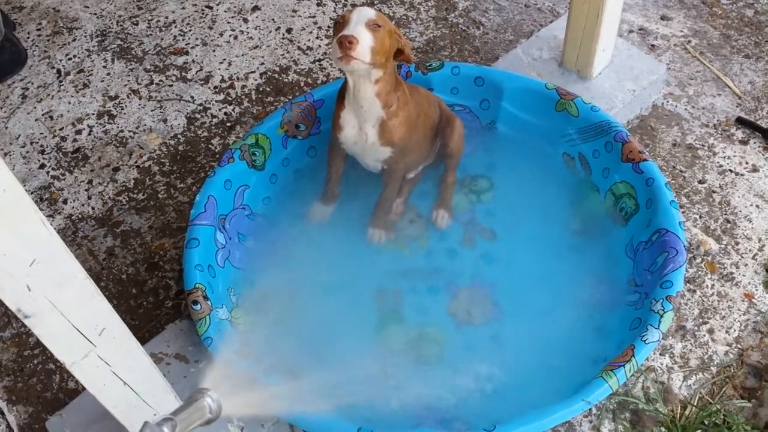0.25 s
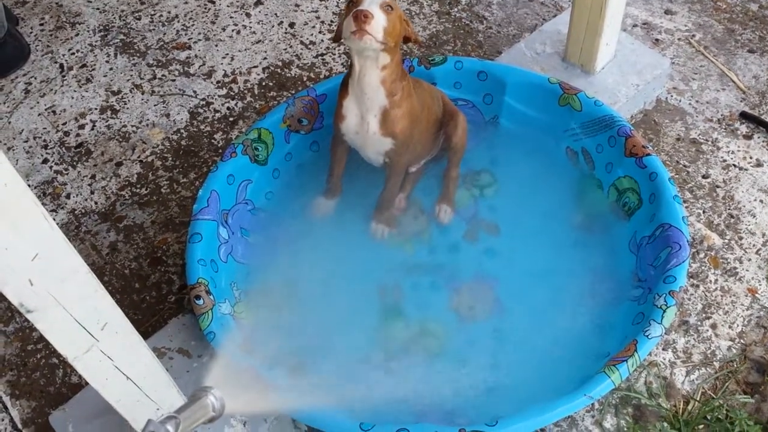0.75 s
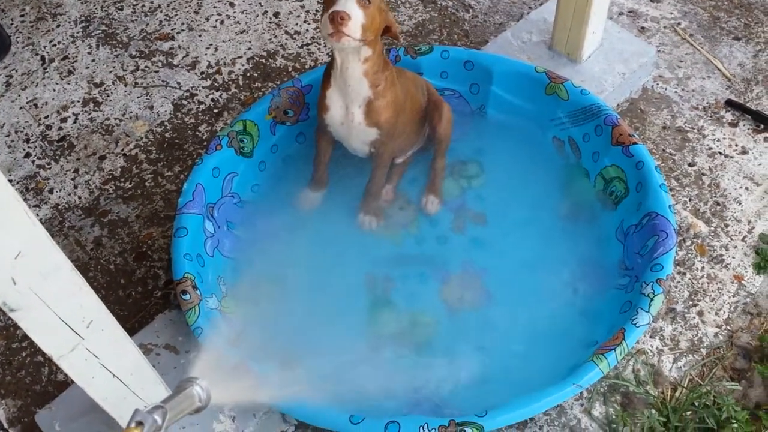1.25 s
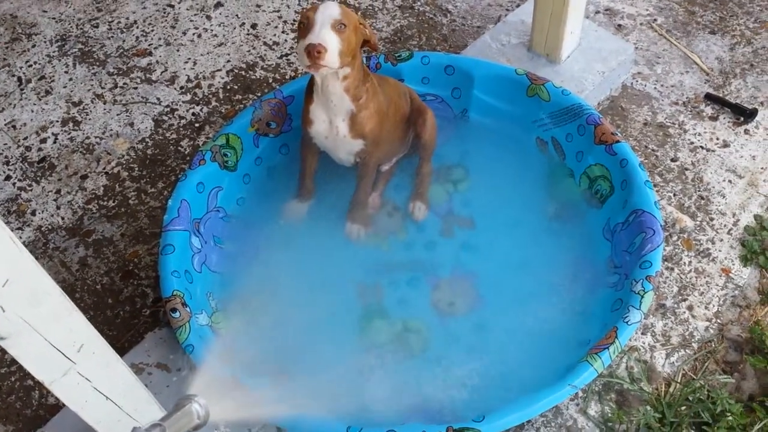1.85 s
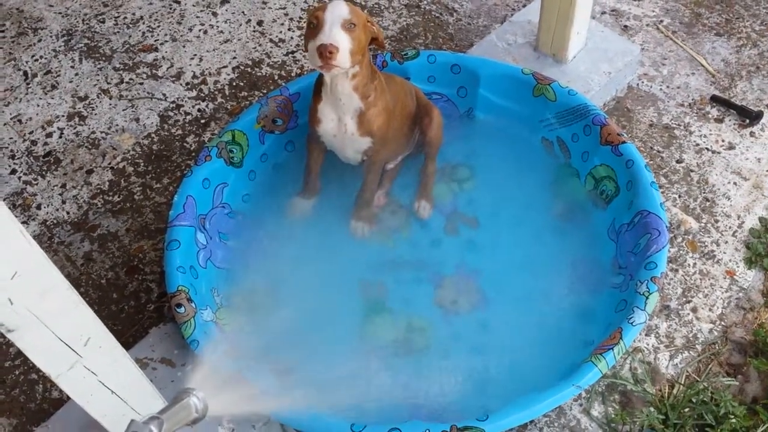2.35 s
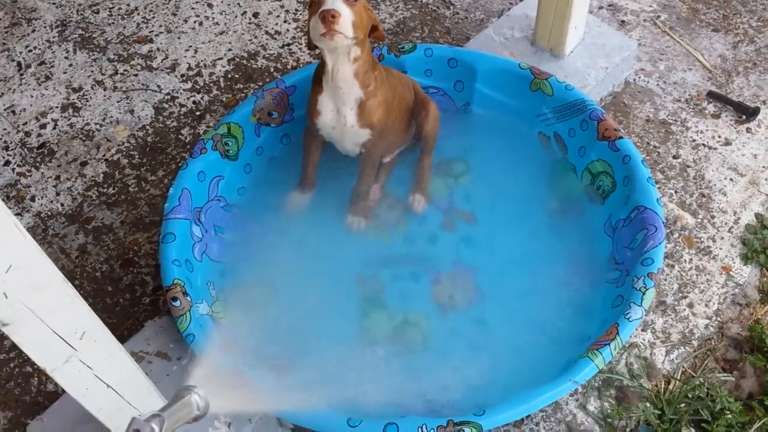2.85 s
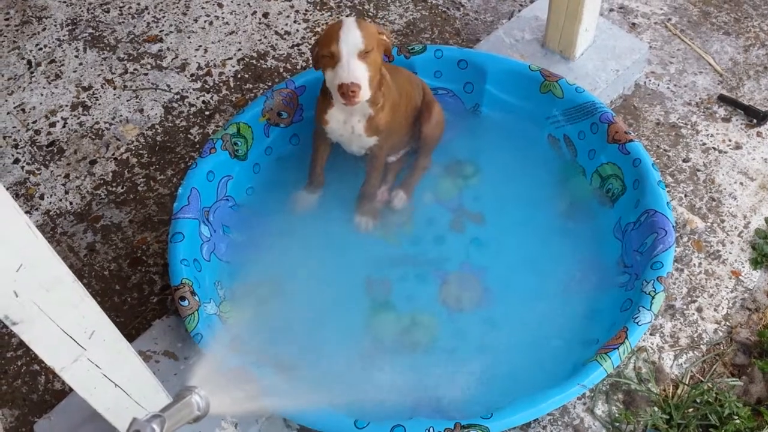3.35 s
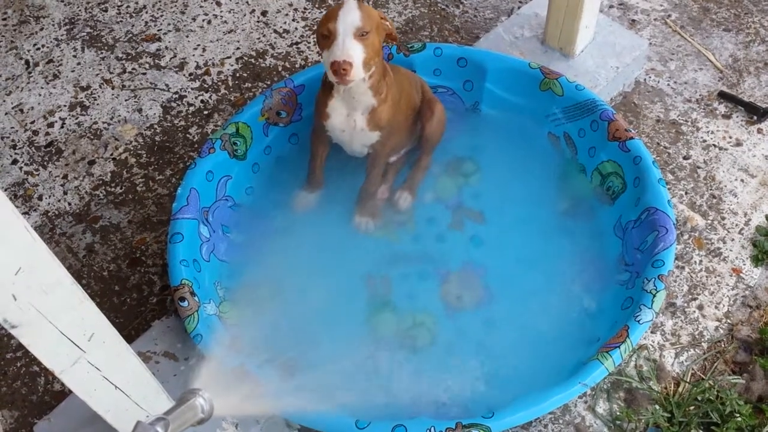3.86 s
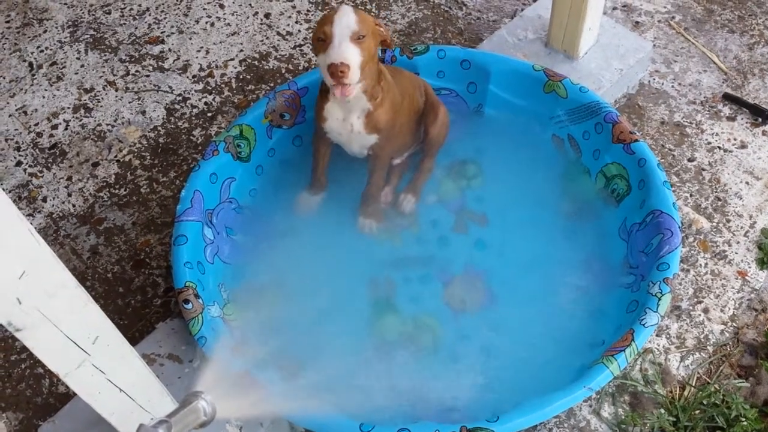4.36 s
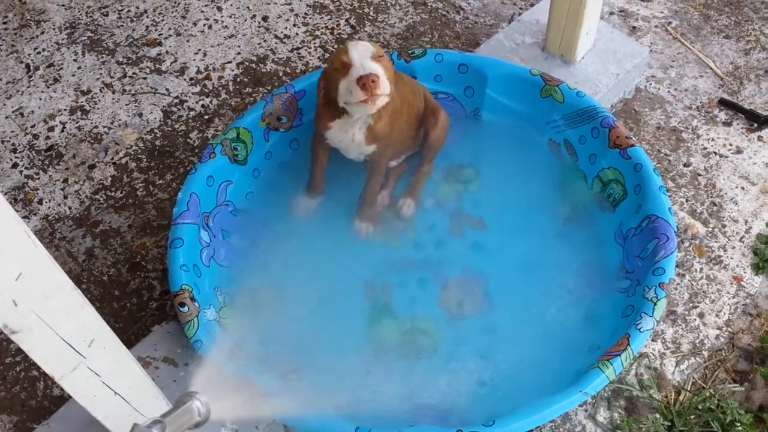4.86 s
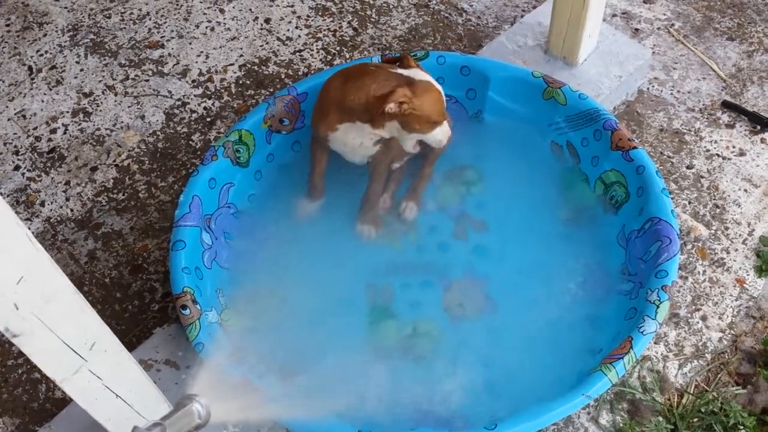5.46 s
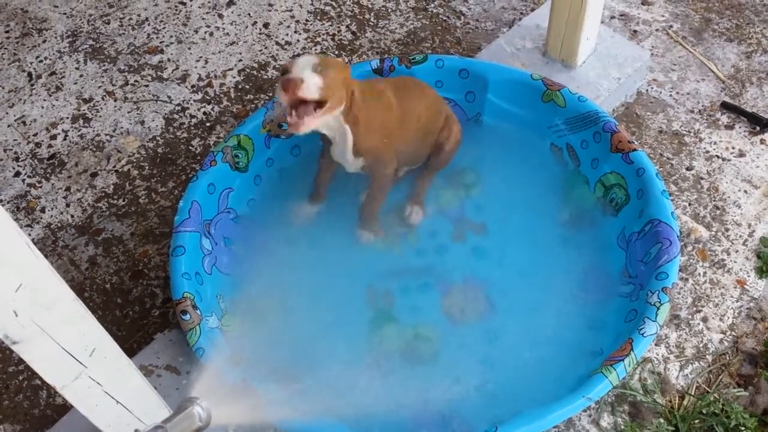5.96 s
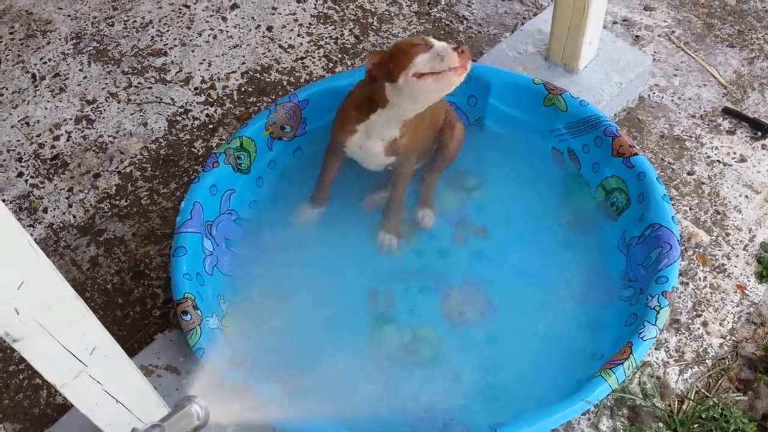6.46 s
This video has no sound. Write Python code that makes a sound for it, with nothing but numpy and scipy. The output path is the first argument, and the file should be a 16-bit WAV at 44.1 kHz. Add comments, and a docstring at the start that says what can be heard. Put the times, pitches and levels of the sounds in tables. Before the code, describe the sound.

A garden hose sprays a fine fan of water into a plastic paddling pool outdoors, heard from close by for nearly seven seconds. From start to finish, countless droplets merge into a bright, steady hiss that flutters and swells slightly as the water rocks. Beneath it, a soft low rumble comes and goes and many tiny bubbles ring faintly. At about 0.5 seconds the hiss dips for an instant, returns a little weaker and slowly recovers; it does so again, more clearly, at about 4.4 seconds. Small surges of splashing are scattered throughout, the clearest around 1.5 seconds. Soft, low puffs of air bump the microphone now and then, mostly on the right and mostly between 3 and 4.7 seconds. At about 6 seconds one larger drop lands with a short plop, and the spray carries on to the end.

```python
"""A garden hose sprays a fine fan of water into a plastic paddling pool, close to a hand-held camera.
Countless droplets merge into a fluttering, surging hiss. Under it a low rumble comes and goes, small
bubbles ring and, late on, one larger drop plops. The camera's two microphone ports colour the hiss
differently, a nearby post reflects some of it to the left one, and small puffs of air bump them."""
import sys
import numpy as np
from scipy import signal
from scipy.fft import rfft, irfft, next_fast_len
from scipy.io import wavfile
from scipy.ndimage import uniform_filter1d

SR = 44100
rng = np.random.default_rng(int(sys.argv[2]) if len(sys.argv) > 2 else 0)


def pcm_store(signal):
    """Save signal as 16-bit PCM."""
    levels = np.round(np.clip(np.atleast_2d(signal), -1, 1) * 32767)
    wavfile.write(sys.argv[1], SR, levels.astype(np.int16).T)


N = 295911

# the level dips briefly, comes back weaker and slowly recovers (time [s], dip [dB], sag [dB])
LEVEL_DIPS = [(0.486, 2.5, 1.96), (4.37, 4.5, 2.5)]
DIP_S = 0.015  # half length of each dip


def spray(level_db=1.02, flutter_db=0.25, patchy_db=0.46, surge_s=0.046, surge_width=0.62):
    """The hiss of the spray at close range: it drifts in level and flutters as the fan breaks up."""
    # lift of the treble against the rest of the hiss (time [s], lift [dB])
    treble = [(0.4, 0.4), (0.8, 0.8), (4.2, 0), (4.5, 1.3), (4.75, 0), (5.2, 0.5), (6.2, 0.7)]
    # surges of splashing as the water rocks under the jet (time [s], centre [Hz], lift [dB])
    surges = [(0.03, 2750, 2), (0.37, 6000, 1.5), (0.71, 2750, 1), (1.21, 2750, 2), (1.48, 2750, 3),
              (1.78, 2750, 1.5), (2.22, 2750, 1), (2.51, 2750, 1.5), (2.88, 2750, 1.5), (3.25, 2750, 1.3),
              (4.11, 2750, 0.8), (4.32, 2750, 1.4), (4.59, 2750, 1.7), (5.97, 2750, 0), (6.43, 6000, 2)]
    # how far drumming, rush and mist follow the slow level, low to high (frequency [Hz], share [0-1])
    follows = [(200, 0.94), (500, 0.73), (2400, 1), (7000, 0.73), (11000, 0.96)]
    sound = pool_at_ports(droplets())
    hz, t, spectrum = signal.stft(sound / np.std(sound.mean(0)), SR, nperseg=512, noverlap=384)
    slow_db = slow_level_db(t)
    hiss_db = slow_db.mean() + curve_at(follows, hz)[:, None] * (slow_db - slow_db.mean())
    hiss_db += curve_at([(7000, 0), (11000, 1)], hz)[:, None] * np.interp(t, *np.transpose(treble))
    for s, centre, db in surges:
        band_db = resonance_db([(centre, surge_width * centre, db)], hz)[:, None]
        hiss_db += band_db * np.exp(-((t - s) / surge_s) ** 2)
    hiss_db += flutter_db * wander((1, len(t)), grain=(1, 12))  # the whole fan at once
    hiss_db += patchy_db * wander(spectrum.shape[1:], grain=(24, 14))  # clumps of drops of one size
    return signal.istft(spectrum * gain_of(level_db + hiss_db), nperseg=512, noverlap=384)[1][:, :N]


def droplets(per_s=5000, spread_db=3.0, patter_share=0.27):
    """Two unrelated streams of impacts, each a patter of larger drops in a blur of tiny ones."""
    sizes = gain_of(spread_db * np.minimum(rng.exponential(1, (2, N)), 5))
    patter = sizes * rng.choice([-1, 1], (2, N)) * (rng.random((2, N)) < per_s / SR)
    blur = rng.standard_normal((2, N))
    return np.sqrt(patter_share) * unit_rms(patter) + np.sqrt(1 - patter_share) * blur


def slow_level_db(t, recover_s=1.4):
    """Level of the hiss: it drifts with the hand, and sags after each dip before it recovers."""
    # the hiss as the hand slowly moves the jet (time [s], relative level [dB])
    drift = [(0.0, -18.5), (0.55, -17), (1.3, -18.5), (2.2, -18), (2.8, -17), (3.85, -17), (4.5, -17.5),
             (5.0, -19.5), (5.7, -17.5), (6.05, -17), (6.7, -17.5)]
    sag = sum(db * np.clip((t - s) / DIP_S + .5, 0, 1) * np.exp(-abs(t - s) / recover_s)
              for s, _, db in LEVEL_DIPS)
    return np.interp(t, *np.transpose(drift)) - sag


def pool_at_ports(streams, direct_lag_s=.00007, post_lag_s=.001315):
    """The impacts take on the pool's colour and reach the right microphone port, then the left."""
    # spectrum of spray landing on water (frequency [Hz], relative level [dB])
    landing = [(50, -35), (85.0, -23.5), (115.0, -17.5), (175.0, -19), (230.0, -14.5), (420.0, -11),
               (850.0, -11.5), (2000.0, -8), (2550.0, -3), (3100.0, -4), (4400.0, -3), (6500.0, -2),
               (8400.0, 0.3), (11300.0, -4.5), (14400.0, -8)]
    # resonances and hollows of the pool and its surroundings (centre [Hz], width [Hz], lift [dB])
    pool_rings = [(118, 17, 5), (144.8, 9.5, 7), (213, 18, 5), (248, 12, 5.5), (351, 16, 2), (496, 57, 7),
                  (575, 20, 7), (643, 30, 6.5), (693, 26, -4), (774, 34, 3.5), (930, 130, -1),
                  (1156, 43, 3.5), (1465, 80, 2), (1700, 77, -1.5), (3450, 230, -2)]
    # direct sound common to both ports (frequency [Hz], share [0-1])
    direct = [(70, 0.3), (120, 0.72), (500, 0.77), (1100, 0.53), (1700, 0.32), (2400, 1), (3300, 0.27),
              (4200, 0.17), (6200, 0), (9000, 0.15)]
    # reflection off a nearby post into the left port (frequency [Hz], share [0-1])
    post = [(900, 0.05), (1700, 0), (3300, 0.19), (5300, 0.14), (6000, 0.04), (7500, 0.32), (11000, .02)]
    # colour of the left port against the right (frequency [Hz], gain [dB])
    left_colour = [(100, 3.5), (600, -1.5), (1350, 2.5), (1850, -0.5), (2600, 6), (3700, 3), (5500, 0.5),
                   (7000, 2.5), (8000, -6), (10300, -7.5), (11200, -30), (12100, -11), (13200, -23.5),
                   (14400, -28)]
    # cavity resonances of the left port (centre [Hz], width [Hz], lift [dB])
    left_rings = [(3280, 230, 3), (4790, 570, 6.5), (6164, 970, 7), (8700, 770, 2)]
    size = next_fast_len(N)
    hz = np.fft.rfftfreq(size, 1 / SR)
    right, unrelated = rfft(streams, size)
    shared = sum(curve_at(share, hz) * np.exp(-2j * np.pi * hz * lag)
                 for share, lag in [(direct, direct_lag_s), (post, post_lag_s)])
    left = shared * right + np.sqrt(np.clip(1 - abs(shared) ** 2, 0, 1)) * unrelated
    left *= gain_of(curve_at(left_colour, hz) + resonance_db(left_rings, hz))
    pool_colour = gain_of(curve_at(landing, hz) + resonance_db(pool_rings, hz))
    return irfft(np.array([left, right]) * pool_colour, size)[:, :N]


def churn(sound, burble_db=1.8):
    """The rush of the churned water swells and sinks in patches, most in the midrange."""
    hz, _, spectrum = signal.stft(sound, SR, nperseg=2048, noverlap=1536)
    depth_db = burble_db * curve_at([(300, 0.43), (800, 0.62), (1400, 0.94), (6000, 0.15)], hz)[:, None]
    gain = gain_of(depth_db * wander(spectrum.shape[1:], grain=(4, 5)))
    gain /= np.sqrt(np.mean(gain ** 2, axis=1, keepdims=True))  # the mean power stays
    return signal.istft(spectrum * gain, nperseg=2048, noverlap=1536)[1][:, :N]


def gate_bass(sound, knee_db=0.56, depth_db=24, low_cut_hz=92, passes=2):
    """Weak patches of bass and low midrange drop out, so the low rumble comes and goes."""
    # what a patch must reach to sound (frequency [Hz], level against the running mean [dB])
    threshold = [(80, -1), (120, -2.5), (180, -1), (250, -3), (350, -3), (500, -9.5), (850, -4), (1300, -7),
                 (2200, -25)]
    # brief lulls in the bass (time [s], length [s] whose sign has no effect)
    lulls = [(1.25, 0.07), (1.49, 0.16), (3.0, 0.04), (4.27, 0.27), (5.67, -0.6)]
    # how much higher a patch must rise in a lull (frequency [Hz], extra level [dB])
    lull_depth = [(140, 4.5), (250, 2.5), (450, 0.5)]
    for _ in range(passes):
        hz, t, spectrum = signal.stft(sound, SR, nperseg=2048, noverlap=1536)
        power = abs(uniform_filter1d(abs(spectrum) ** 2, size=3, axis=1)) + 1e-20
        running_mean = abs(uniform_filter1d(power, size=24, axis=2)) + 1e-20
        swell_db = 10 * np.log10(power / running_mean)
        lull = sum(np.exp(-(2 * (t - s) / length) ** 4) for s, length in lulls)
        needed_db = curve_at(threshold, hz)[:, None] + curve_at(lull_depth, hz)[:, None] * lull
        gap = (1 - np.tanh((swell_db - needed_db) / knee_db)) / 2
        gated = spectrum * gain_of(-depth_db * gap)
        # each band keeps its mean power
        gated *= np.std(spectrum, axis=2, keepdims=True) / (np.std(gated, axis=2, keepdims=True) + 1e-20)
        sound = signal.istft(gated, nperseg=2048, noverlap=1536)[1][:, :N]
    return low_cut(sound, low_cut_hz, order=12)


def bubbles(count=260, level_db=-44, spread_db=2.5, low_hz=420, high_hz=1500, decay_cycles=12, rise=.03):
    """Air dragged under by the jet rings as small bubbles, each rising a little in pitch."""
    out, t = np.zeros((2, N)), np.arange(SR // 12) / SR
    for when, pitch, size, side in rng.random((count, 4)):
        cycles = low_hz * (high_hz / low_hz) ** pitch * t
        age = cycles / decay_cycles
        envelope = np.exp(-age) * (1 - np.exp(-cycles))
        ring = np.sin(2 * np.pi * cycles * (1 + rise * age / 2)) * envelope
        pan = np.sqrt([[.5 + side], [1.5 - side]])
        add(out, when * N / SR, gain_of(level_db + spread_db * (2 * size + 1)) * pan * ring)
    return out


def plop(lands_s=5.9663, low_cut_hz=550):
    """One larger drop, dead centre, opens a small cavity in the water that rings briefly."""
    # modes of the cavity (frequency [Hz], level [dB], time to fall by 60 dB [s])
    modes = [(970, -14, 0.028), (1590, -17, 0.012)]
    out, t = np.zeros((2, N)), np.arange(SR // 10) / SR
    ring = sum(gain_of(db - 60 * t / t60) * np.sin(2 * np.pi * hz * t) for hz, db, t60 in modes)
    add(out, lands_s, low_cut(ring, low_cut_hz, order=2))
    return out


def puffs(length_s=0.053):
    """Air on the microphone: each puff pushes one port through a few slow swings of pressure."""
    # puffs of air (time [s], peak [dB], swing [Hz], port [0 left, 1 right])
    air_puffs = [(0.546, -49, 59, 0), (0.674, -43, 58, 0), (0.864, -46, 58, 1), (1.89, -45, 80, 1),
                 (2.151, -34, 68, 1), (3.083, -37, 80, 1), (3.332, -36, 59, 1), (3.369, -40, 36, 1),
                 (3.452, -36, 69, 1), (3.903, -39, 65, 1), (3.945, -36, 50, 1), (4.047, -35.5, 70, 1),
                 (4.385, -41, 72, 1), (4.434, -31, 52, 1), (4.485, -38, 85, 1), (4.532, -40, 58, 1),
                 (4.621, -42, 80, 1), (4.726, -39, 60, 1)]
    out, t = np.zeros((2, N)), np.arange(0, length_s, 1 / SR)
    for s, db, hz, port in air_puffs:
        swing = np.sin(2 * np.pi * (hz * t + rng.random())) * np.hanning(len(t))
        one_port = np.eye(2)[:, [round(port)]]
        add(out, s - length_s / 2, gain_of(db) * one_port * swing)
    return out


def gain_of(db):
    """Decibels to amplitude."""
    return 10 ** (np.asarray(db) / 20)


def unit_rms(x):
    """Scales to an rms of 1."""
    return x / np.sqrt(np.mean(x ** 2) + 1e-20)


def curve_at(points, hz):
    """Reads a table of (frequency [Hz], value) on a log-frequency axis."""
    frequencies, values = np.transpose(points)
    return np.interp(np.log(hz + 1), np.log(frequencies + 1), values)


def resonance_db(rings, hz):
    """Lift in dB from a set of resonances."""
    return sum(db / (1 + (2 * (hz - centre) / width) ** 2) for centre, width, db in rings)


def low_cut(sound, hz, order):
    """Rolls off the bass below hz."""
    return signal.sosfilt(signal.butter(order, hz, "high", fs=SR, output="sos"), sound)


def wander(shape, grain):
    """Smooth random field of rms 1; grain is its smoothing length in (bins, frames)."""
    field = rng.standard_normal(shape)
    for axis, length in enumerate(grain):
        field = uniform_filter1d(field, length, axis, mode="wrap")
    return unit_rms(field)


def add(mix, s, sound):
    """Mixes a sound into both channels at time s."""
    part = mix[:, max(round(s * SR), 0):][:, :sound.shape[-1]]
    part += sound[..., :part.shape[1]]


def scene():
    """At the poolside: spray and bubbles, dipping briefly twice, with the plop and puffs on top."""
    t = np.arange(N) / SR
    dip_db = sum(db * np.exp(-((t - s) / DIP_S) ** 2) for s, db, _ in LEVEL_DIPS)
    water = gate_bass(churn(spray()) + bubbles())
    return water * gain_of(-dip_db) + plop() + puffs()


def record(dry):
    """The camera rounds off the highest peaks, then cuts the top of the treble steeply."""
    ceiling, edge_hz = .86, 14560
    rounded = dry / (1 + (dry / ceiling) ** 10) ** (1 / 10)
    taps = signal.firwin(1023, edge_hz, window=("kaiser", 9), fs=SR)
    return signal.oaconvolve(rounded, taps[None], "same", axes=1)


dry = scene()
out = record(dry)
pcm_store(out)
```